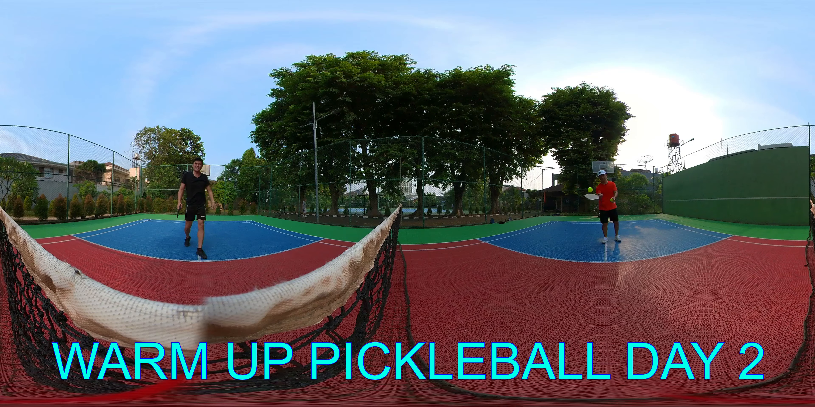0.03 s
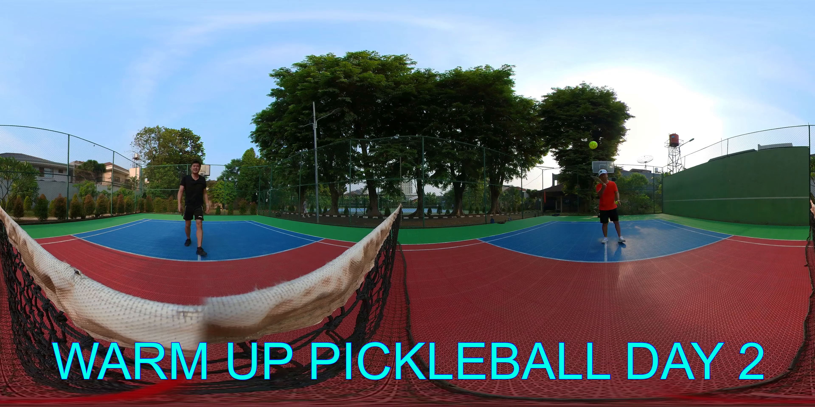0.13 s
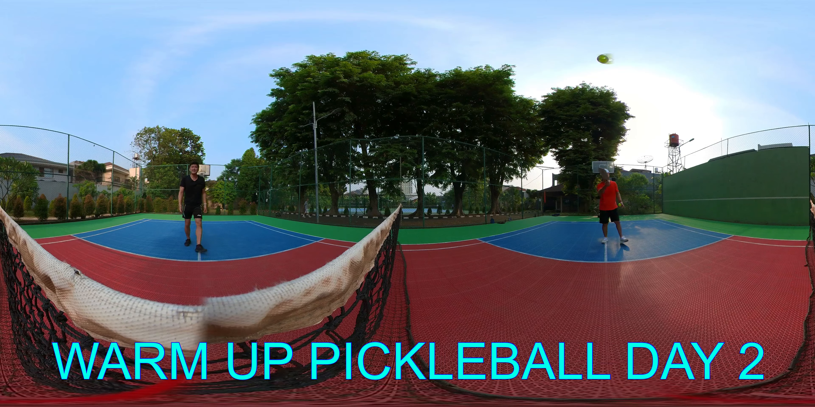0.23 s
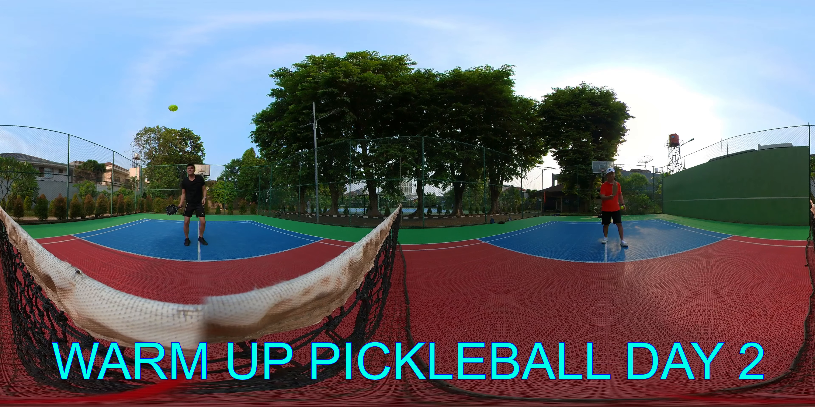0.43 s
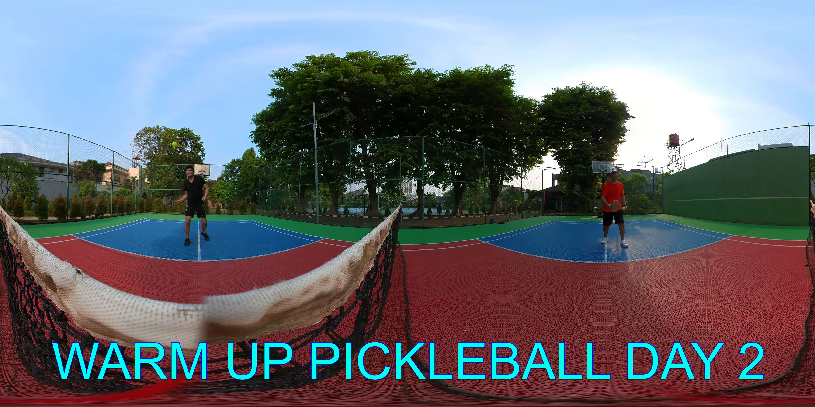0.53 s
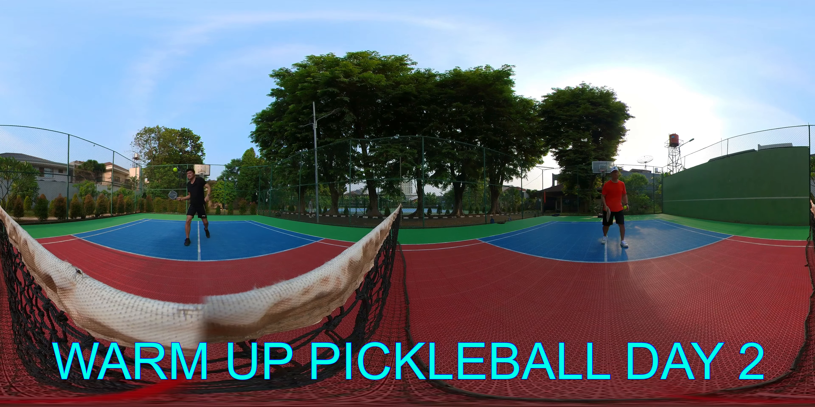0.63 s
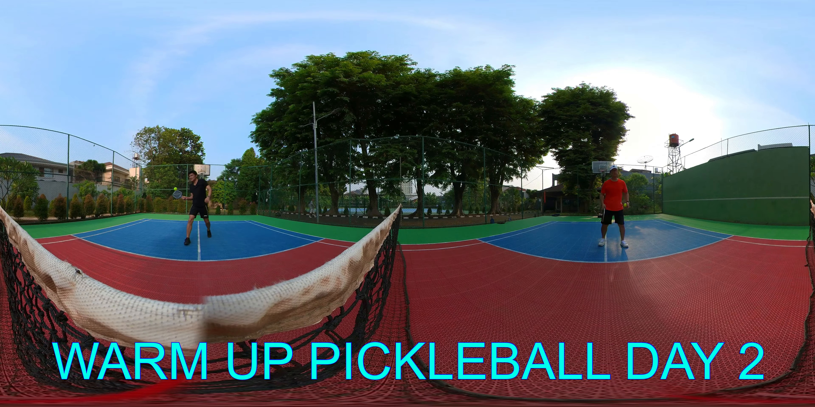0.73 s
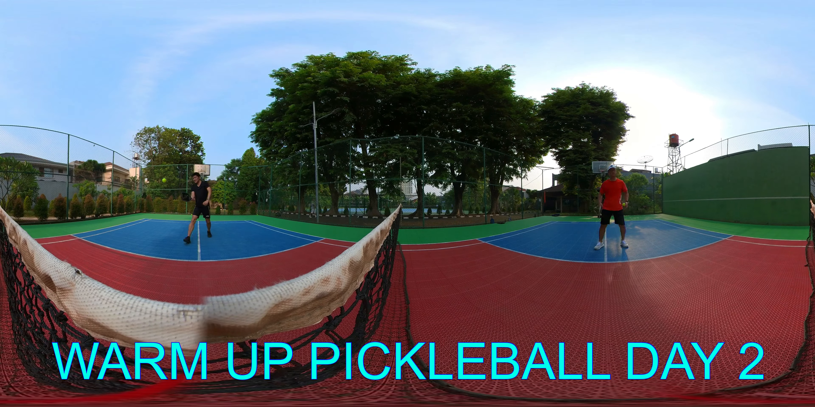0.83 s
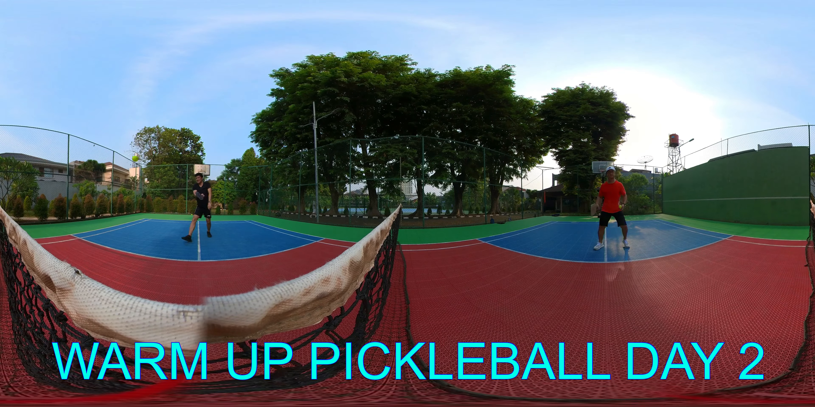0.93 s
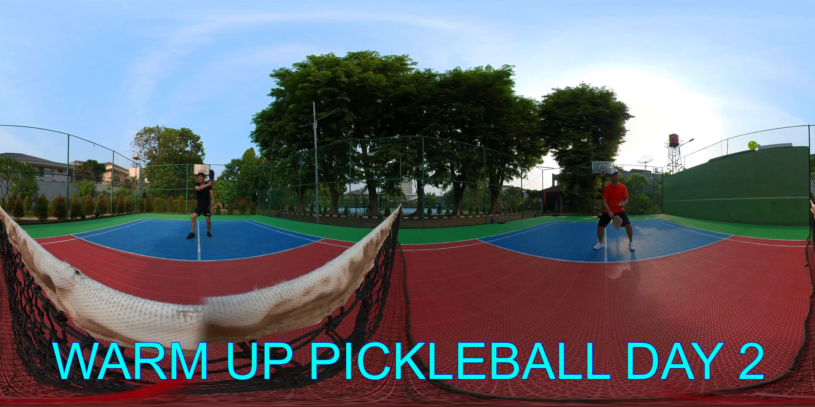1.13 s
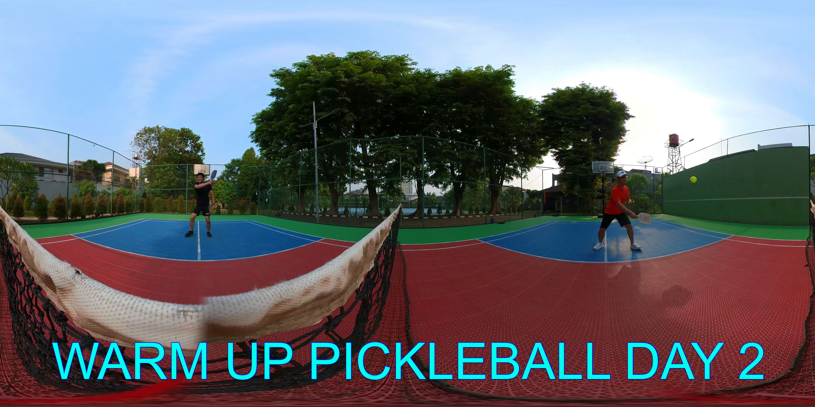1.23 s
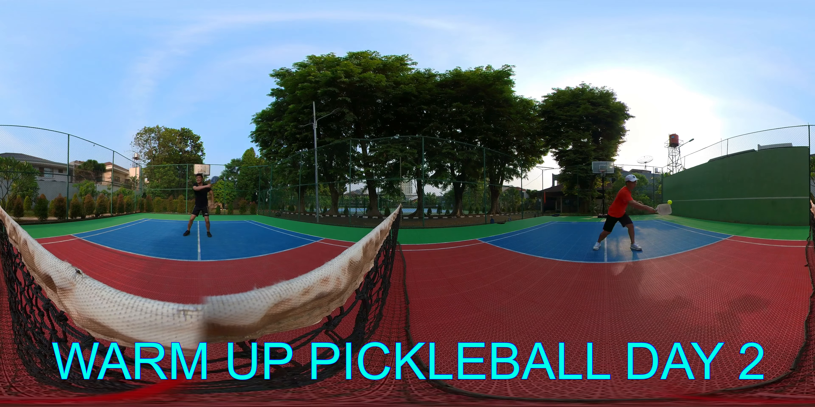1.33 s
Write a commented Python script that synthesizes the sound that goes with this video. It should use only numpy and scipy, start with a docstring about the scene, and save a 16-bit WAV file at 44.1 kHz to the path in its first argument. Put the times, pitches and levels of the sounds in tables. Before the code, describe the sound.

Two sharp hollow pops of a plastic ball on paddles, with short outdoor echoes

```python
"""Two paddles pop a hollow plastic ball across an outdoor court, heard from the net post.
Each pop is a short push that rings the paddle, plus a crack of noise from the ball's shell.
It slaps back off ground and fences, and returns late from far buildings as scattered noise.
Shaped noise makes the ball's hiss, the lingering rings, the scuffs and the low town rumble;
small far knocks are single swelling tones. The sound comes in late, with a dropout and a dip."""
import sys
import numpy as np
from scipy import signal
from scipy.fft import rfft, irfft, next_fast_len
from scipy.io import wavfile

SR = 44100
rng = np.random.default_rng(int(sys.argv[2]) if len(sys.argv) > 2 else 0)


def master_out(mix):
    """Clip the mix to full scale and print it as 16-bit PCM to the path in sys.argv[1]."""
    frames = np.transpose(np.atleast_2d(mix))
    ceiling = np.clip(frames, -1, 1)
    pcm = np.round(ceiling * 32767).astype(np.int16)
    wavfile.write(sys.argv[1], SR, pcm)


N = 61739
TIME = np.arange(N) / SR  # s
SIZE = next_fast_len(N + SR // 4)  # transform length, with spare room for delays
HZ = np.maximum(np.arange(SIZE // 2 + 1) * SR / SIZE, 1)


def amp(db):
    """Turn decibels into a gain."""
    return 10 ** (np.asarray(db) / 20)


def rms_one(x):
    """Scale a sound to an average (rms) strength of 1."""
    return x / np.sqrt(np.mean(x ** 2) + 1e-20)


def since(s):
    """Seconds passed since moment s, zero before it."""
    return np.maximum(TIME - s, 0)


def in_time(rows):
    """Draw straight lines through (time, value) points."""
    return np.interp(TIME, *np.transpose(rows))


def at_hz(points):
    """Join (frequency, value) points along a logarithmic frequency scale."""
    f, value = np.transpose(points)
    return np.interp(np.log(HZ), np.log(f), value)


def filtered(x, response):
    """Shape a sound by a frequency response."""
    return irfft(rfft(x, SIZE) * response, SIZE)[..., :N]


def sides(db):
    """Left and right gains for a left-minus-right level."""
    return amp(np.multiply.outer([.5, -.5], db))


def ports(rows):
    """Left and right microphone port responses, from level and phase differences."""
    hz, db, lead = np.transpose(rows)
    phase = np.multiply.outer([.5, -.5], at_hz(np.c_[hz, lead]))
    return sides(at_hz(np.c_[hz, db])) * np.exp(1j * phase)


def pair(alike):
    """Spectra of two noises that are partly alike: a shared part plus an opposed part."""
    mid, side = rfft(rng.standard_normal((2, SIZE)))
    alike = np.clip(alike, 0, 1)
    return np.sqrt(1 + alike) * mid + np.sqrt(1 - alike) * side * [[1], [-1]]


# likeness of the two ports for scattered sound: (f/Hz, likeness 0-1)
WIDE_LIKENESS = [(200, 1), (1500, 0.8), (3500, 0.3), (14000, 0.2)]


def scattered(shape):
    """Noise of a given spectrum arriving from all around, rms 1."""
    return rms_one(irfft(pair(at_hz(WIDE_LIKENESS)) * shape, SIZE)[:, :N])


# town rumble: colour (f/Hz, level/dB) and overall level/dB
TOWN_COLOUR = [(30, -49.5), (86, 1.5), (118, -5.5), (259, -23), (374, -30.5), (540, -28), (11000, -61),
               (14200, -33), (16000, -46.5)]
TOWN_DB = -60
# its left-minus-right balance (f/Hz, level/dB) and left-right likeness (f/Hz, likeness 0-1)
TOWN_BALANCE = [(60, 3), (1500, -2), (15000, 2.5)]
TOWN_LIKENESS = [(60, 0.3), (150, 1), (500, 0.33), (2000, 0.33)]


def town():
    """Steady stereo noise, strongest in the bass: a low rumble."""
    spectrum = pair(at_hz(TOWN_LIKENESS)) * amp(at_hz(TOWN_COLOUR)) * sides(at_hz(TOWN_BALANCE))
    return amp(TOWN_DB) * rms_one(irfft(spectrum, SIZE)[:, :N])


# loudness of the flying ball's hiss: (t/s, level/dB)
FLIGHT = [(.04, -61.5), (.19, -58), (.34, -73.5), (.57, -103), (.6, -73), (.64, -99), (.75, -82.5),
          (.8, -63.5), (.92, -53.5), (.98, -44.5), (1.0, -61), (1.02, -48.5), (1.07, -55.5), (1.15, -61.5),
          (1.2, -63.5), (1.25, -72.5), (1.31, -114), (1.36, -66.5), (1.4, -88)]
# colour of that hiss: (f/Hz, level/dB)
HISS_COLOUR = [(1500, -26), (2390, -29.5), (3480, -11.5), (5280, -19), (9950, -17), (14500, -5.5),
               (15700, -8.5), (16000, -35)]


def ball_hiss():
    """Air rushing past the holed ball: coloured noise that rises and falls with its flight."""
    return amp(in_time(FLIGHT)) * scattered(amp(at_hz(HISS_COLOUR)))


# colour of the shell's crack: (f/Hz, level/dB per Hz)
CRACK_COLOUR = [(2500, -10.5), (4300, -12), (6200, -16.5), (7830, -6.5), (10100, -22), (13300, -3),
                (15500, 3.5), (16300, -31)]


def pop(s, db, contact, modes, crack_db, crack_t60):
    """A short push rings the paddle's modes; the shell cracks in a burst of grit."""
    t = since(s)
    ringing = sum(amp(level_db - 60 * t / t60) * np.sin(2 * np.pi * hz * t)
                  for hz, level_db, t60 in modes)
    # a longer contact softens the treble and delays the push by half its length
    softness = (np.pi * HZ * contact / 2) ** 2 / 8
    push = np.exp(-softness - 1j * np.pi * HZ * contact)
    grit = rms_one(filtered(rng.standard_normal(N), amp(at_hz(CRACK_COLOUR)) * (HZ > 2000)))
    crack = amp(crack_db - 60 * t / crack_t60) * (t > 0) * grit
    return -amp(db) * filtered(ringing, push) + crack


# the two hits: (t/s, level/dB of the ringing, contact time/s)
HITS = [(0.1554, -15.5, 0.00056), (0.9473, -14, 0.00038)]
# each paddle with the ball on it, one list per hit: (f/Hz, level/dB, time to fall 60 dB/s)
PADDLES = [
    [(231, -4.5, 0.027), (523, 0, 0.015), (683, 8.5, 0.01), (1222.5, -2, 0.046), (1450, -19, 0.067),
     (2016, -13, 0.021), (3947, 8.5, 0.018)],
    [(160, -4.5, 0.0325), (586, -1.5, 0.0059), (1039, 8, 0.014), (1772, 0, 0.025), (2220, 0.5, 0.018),
     (2810, -2, 0.022), (3240, -4, 0.016), (4120, -7.5, 0.011)],
]
# crack of the shell, one row per hit: (level/dB, time to fall 60 dB/s)
CRACKS = [(-20, 0.026), (-18, 0.02)]


def bare_pops():
    """The two pops at their source, before any reflection."""
    return [pop(*hit, modes, *crack) for hit, modes, crack in zip(HITS, PADDLES, CRACKS)]


# a faint, dulled copy about 8 ms ahead of each pop, then bounces off the court and slaps off
# the nearest walls, one list per hit: (t/s from the pop, level/dB, f/Hz above which it is dulled)
ARRIVALS = [
    [(-.0076, -31, 1879), (.0032, -14, 9130), (.0138, -16.5, 1000), (.0216, -17, 15590)],
    [(-.0078, -28, 2000), (.002, -4, 12100), (.004, -13.5, 11800), (.0148, -19.5, 920), (.049, -32, 2960)],
]
# the two microphone ports, one list per hit: (f/Hz, left-minus-right level/dB, left lead/radians)
POP_PORTS = [
    [(139, 6, 0.5), (217, 7, -0.26), (398, -2, 0.5), (1220, -1, 1), (2240, -9, 1.62), (4250, 11.5, 4.5),
     (6300, 6.5, 8.5), (14000, -10, 6)],
    [(140, 6.5, -1.4), (210, 17, -1.3), (318, -5, -1.3), (616, 1, 0.24), (1020, -4, -1.39),
     (3300, -9, -1.4), (8000, -5, -1), (14100, -8, 1)],
]


def direct_pops(pops):
    """Each pop with duller copies: one faint and slightly early, others delayed by near surfaces."""
    total = 0
    for bare, arrivals, port_rows in zip(pops, ARRIVALS, POP_PORTS):
        paths = 1
        for lag, db, dull_hz in arrivals:
            shift = np.exp(-2j * np.pi * HZ * lag)
            paths = paths + amp(db) * shift / (1 + 1j * HZ / dull_hz)
        total = total + filtered(bare, paths * ports(port_rows))
    return total


# rings, narrow or airy, that linger after a pop:
# (start t/s, centre f/Hz, half-width f/Hz, level/dB at the start, fade time/s)
RINGS = [(0.27, 3110, 71, -66.5, 0.28), (0.15, 3810, 1400, -59, 0.29), (0.95, 950, 78, -51.5, 0.34)]


def lingering_rings():
    """Wavering bands of noise that hang on, then fade ever faster."""
    total = 0
    for s, hz, width, db, fade in RINGS:
        band = scattered(1 / (1 + ((HZ - hz) / width) ** 2))
        # 20.5 dB down after one fade time
        total = total + amp(db - 20.5 * ((TIME - s) / fade) ** 2) * (TIME > s) * band
    return total


AIR_DB_PER_S, AIR_HZ = 20.5, 2000  # extra fading of the treble, and where treble begins


def echo(bare, s, curve, colour, blur):
    """The pop scattered by a cloud of reflections; treble fades with the distance travelled."""
    cloud = scattered(1)
    short = bare * amp(-60 * since(s) / blur)
    from_zero = rfft(short, SIZE) * np.exp(2j * np.pi * HZ * s)  # pop moved to time zero
    wet = rms_one(filtered(cloud, from_zero * amp(at_hz(colour))))
    low = signal.sosfilt(signal.butter(2, AIR_HZ, fs=SR, output="sos"), wet)
    wet = low + (wet - low) * amp(-AIR_DB_PER_S * since(s))
    return wet * amp(in_time(curve)) * (TIME > curve[0][0]) * (TIME <= curve[-1][0])


# loudness of the scattered echo, one list per hit: (t/s, level/dB)
ECHO_CURVES = [
    [(.183, -43.5), (.205, -50.5), (.24, -48.5), (.275, -57.5), (.293, -55.5), (.32, -64), (.39, -60.5),
     (.41, -76.5), (.54, -74.5), (.57, -65), (.61, -62), (.64, -68)],
    [(.966, -38), (.985, -49.5), (1.008, -44.5), (1.04, -42), (1.07, -50.5), (1.115, -51), (1.17, -54),
     (1.197, -48), (1.225, -64), (1.4, -57.5)],
]
# colour of fences and walls, one list per hit: (f/Hz, level/dB)
ECHO_COLOURS = [
    [(100, 3.5), (330, 3), (700, -0.5), (1500, 7), (3000, 5), (5200, 10), (15000, 4)],
    [(140, -3.5), (330, 3.5), (650, 0.5), (1000, 6), (1450, 5.5), (2200, 14), (5000, 17.5), (15000, 15.5)],
]
# how fast the pop is shortened before scattering, one value per hit: (time to fall 60 dB/s)
ECHO_BLURS = [.03, 0.008]


def echoes(pops):
    """Each pop coming back scattered from fences, walls and far buildings."""
    total = 0
    for k, bare in enumerate(pops):
        total = total + echo(bare, HITS[k][0], ECHO_CURVES[k], ECHO_COLOURS[k], ECHO_BLURS[k])
    return total


# small far knocks: (t/s, peak level/dB, f/Hz)
KNOCKS = [(.19, -41, 216.7), (.341, -51.5, 773), (.371, -57, 592), (.595, -54, 215.4), (1.03, -40, 786),
          (1.027, -56, 146), (1.029, -54, 218.4), (1.121, -50.5, 710)]
KNOCK_CYCLES = 18  # cycles over which the decay factor falls 60 dB


def knocks():
    """Dull single tones that swell for a few cycles and die away."""
    total = 0
    for s, db, hz in KNOCKS:
        x = since(s) * hz * np.log(1000) / KNOCK_CYCLES
        swell = np.e * x * np.exp(-x)  # peaks at 1
        total = total + amp(db) * swell * np.sin(2 * np.pi * hz * (TIME - s))
    return total


# scuffs of noise, perhaps shoes: (t/s, starting level/dB, time to fall 60 dB/s, centre f/Hz)
SCUFFS = [(0.284, -60.5, 0.22, 1900), (1.311, -57, 0.25, 904), (1.359, -55.5, 0.19, 1320)]
SCUFF_OCTAVES = 0.97  # the spectrum falls to 1/e this far either side of its centre


def scuffs():
    """Bursts of broad noise that start abruptly and die away."""
    total = 0
    for s, db, t60, hz in SCUFFS:
        noise = scattered(np.exp(-(np.log2(HZ / hz) / SCUFF_OCTAVES) ** 2))
        total = total + amp(db - 60 * np.abs(TIME - s) / t60) * (TIME > s) * noise
    return total


# the two ports for sound from around: (f/Hz, left-minus-right level/dB, left lead/radians)
WIDE_PORTS = [(139, 12, -0.9), (215, 16, -1.3), (400, -5, -1.05), (690, -9, -0.5), (1990, -8, 1.5),
              (3200, -10, 3.5), (5030, 1, -0.7), (14000, -8.5, 0)]


def scene():
    """Town, ball hiss, pops, rings, echoes, far knocks and scuffs together."""
    pops = bare_pops()
    around = ball_hiss() + lingering_rings() + echoes(pops) + knocks() + scuffs()
    return town() + direct_pops(pops) + filtered(around, ports(WIDE_PORTS))


# the sound comes in late, drops out once and dips before the first pop: (t/s, level/dB)
OPENING = [(.035, -80), (.037, -18), (.046, 0), (.058, 0), (.06, -30), (.066, -80), (.075, -25), (.08, 0),
           (.13, 0), (.134, -8), (.1455, -8), (.1465, 0)]
TOP = 0.4  # height at which peaks round off
LOW_CUT_HZ, CUTOFF_HZ = 145, 16800


def record(dry):
    """Peaks are rounded, the opening level is shaped, and bass and top are cut."""
    rounded = TOP * np.tanh(dry / TOP)
    opened = rounded * amp(in_time(OPENING))
    thin = signal.sosfilt(signal.butter(2, LOW_CUT_HZ, "high", fs=SR, output="sos"), opened)
    return signal.sosfilt(signal.cheby2(12, 60, CUTOFF_HZ, fs=SR, output="sos"), thin)


dry = scene()
out = record(dry)
master_out(out)
```